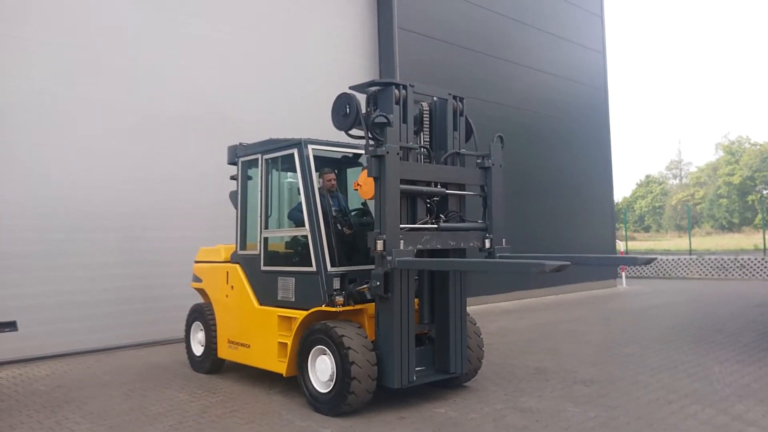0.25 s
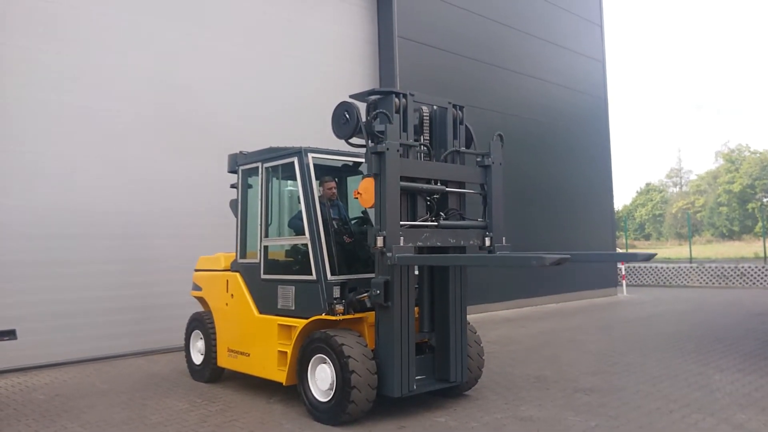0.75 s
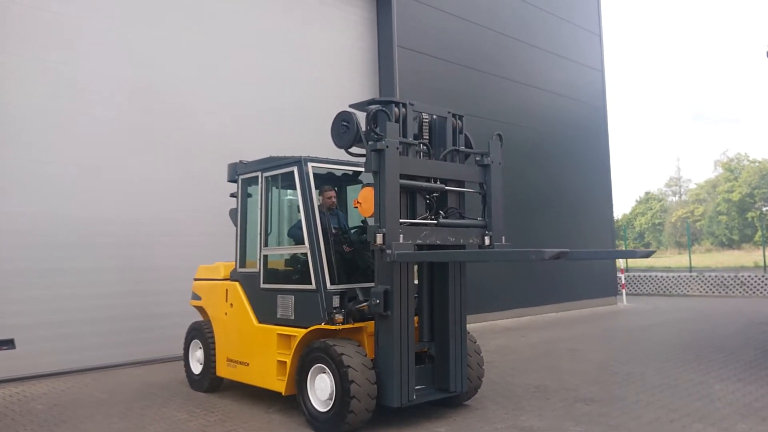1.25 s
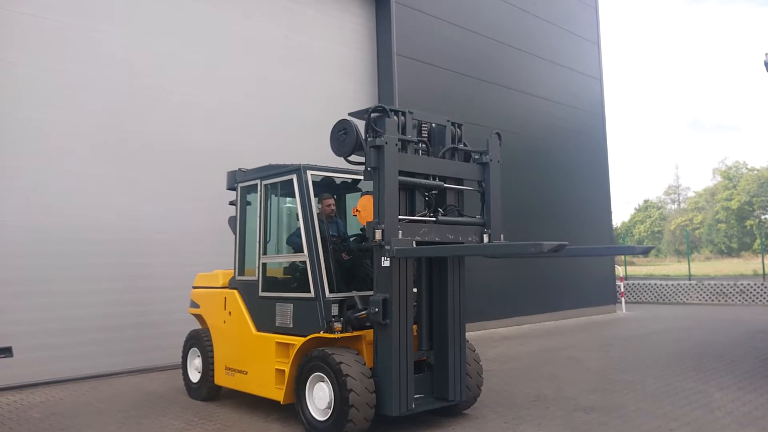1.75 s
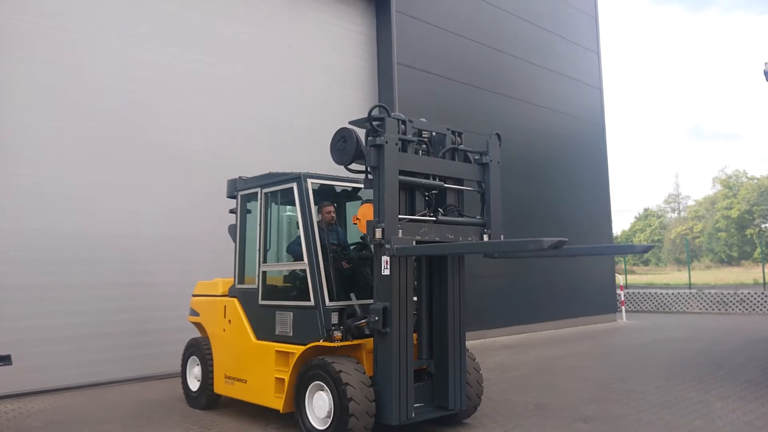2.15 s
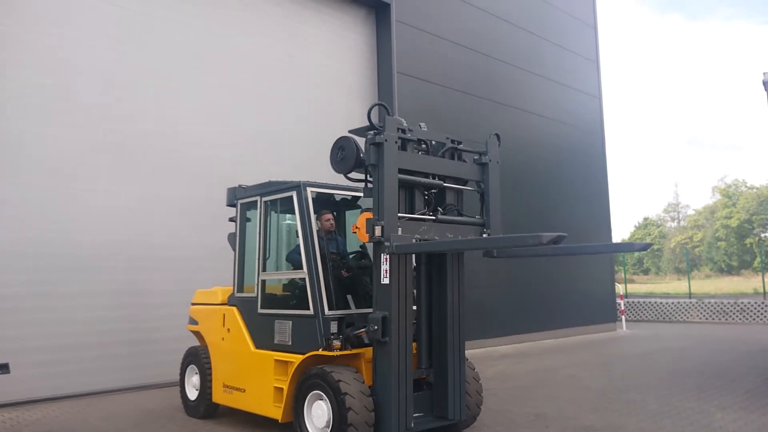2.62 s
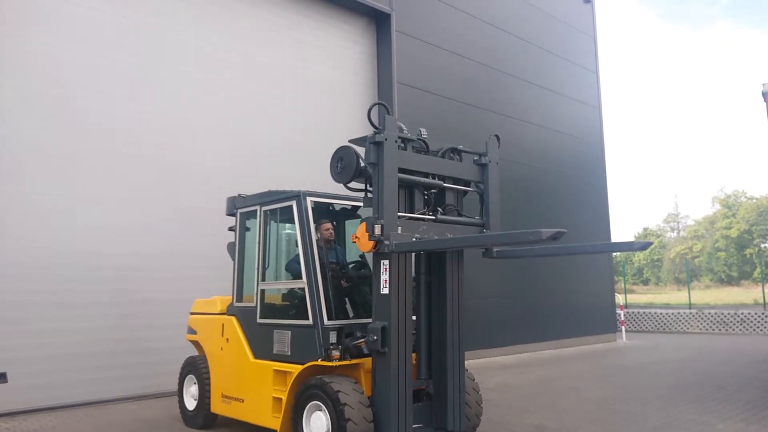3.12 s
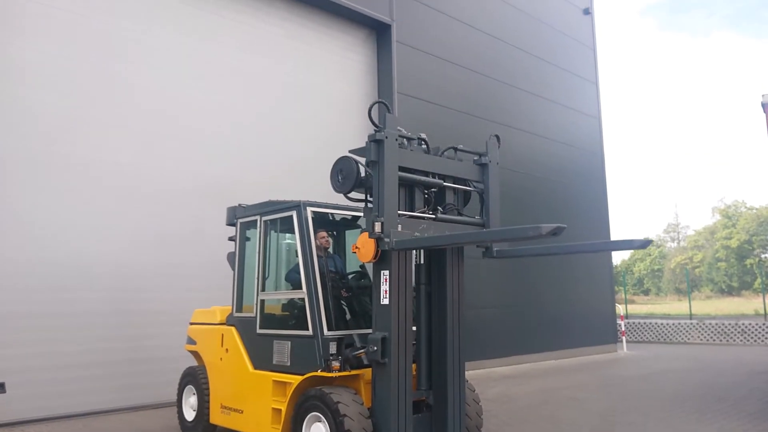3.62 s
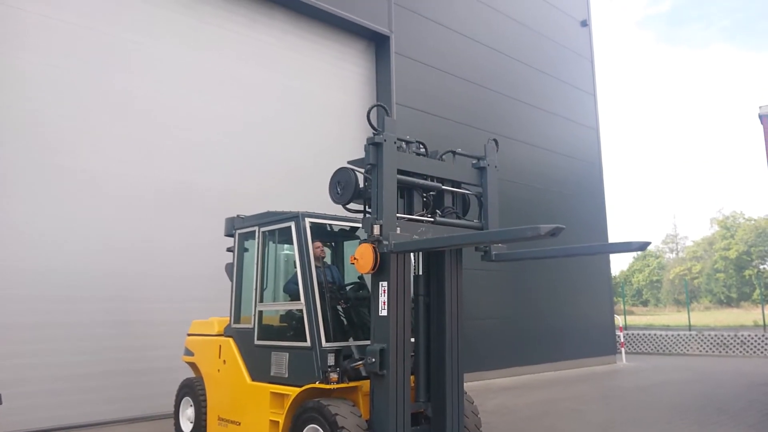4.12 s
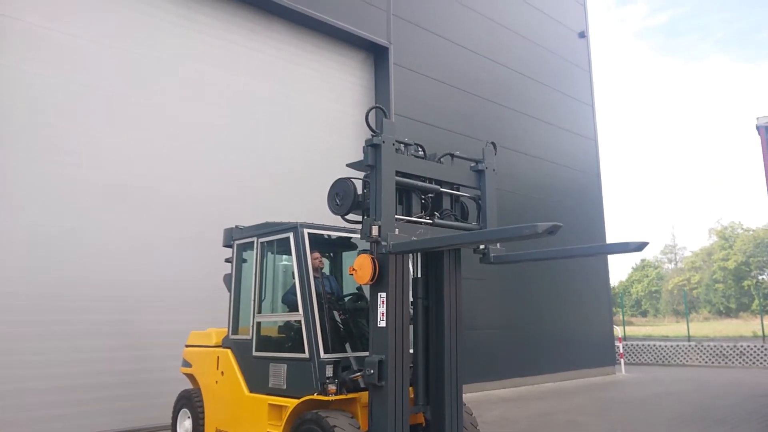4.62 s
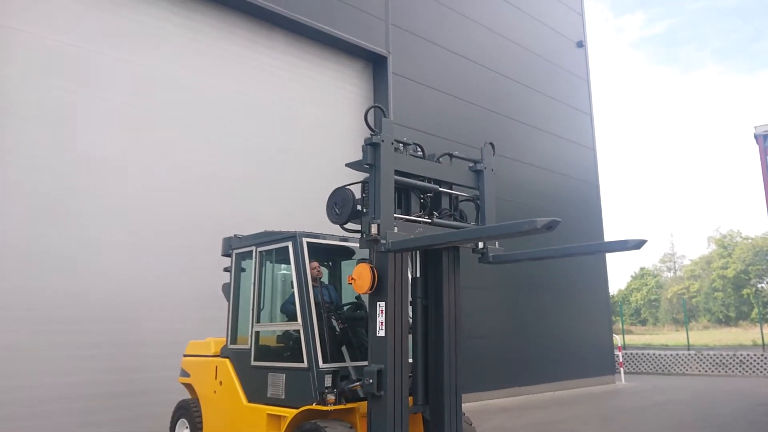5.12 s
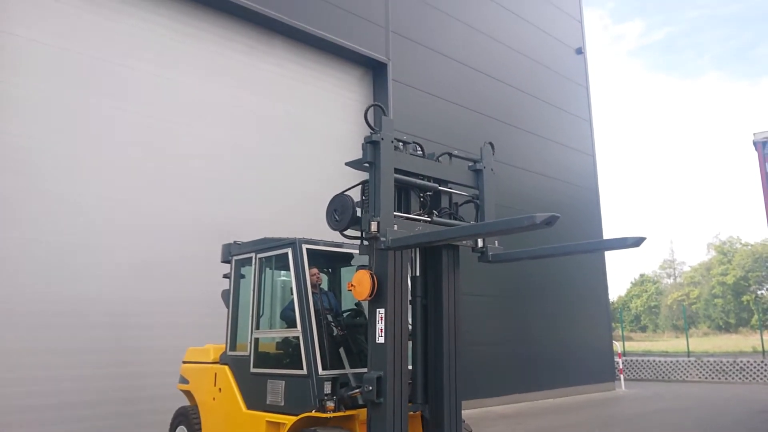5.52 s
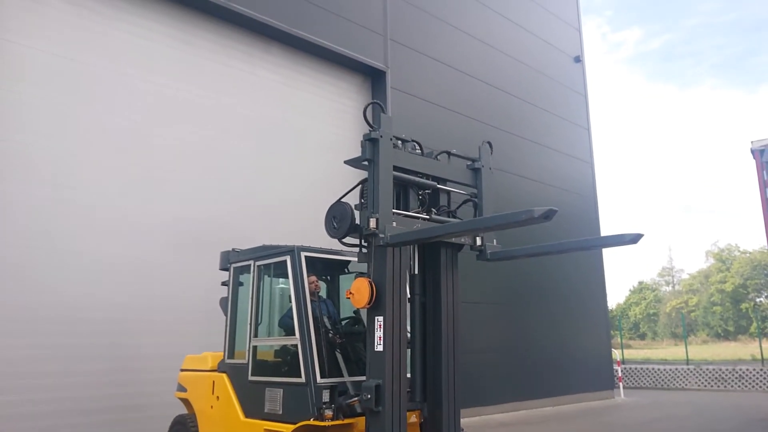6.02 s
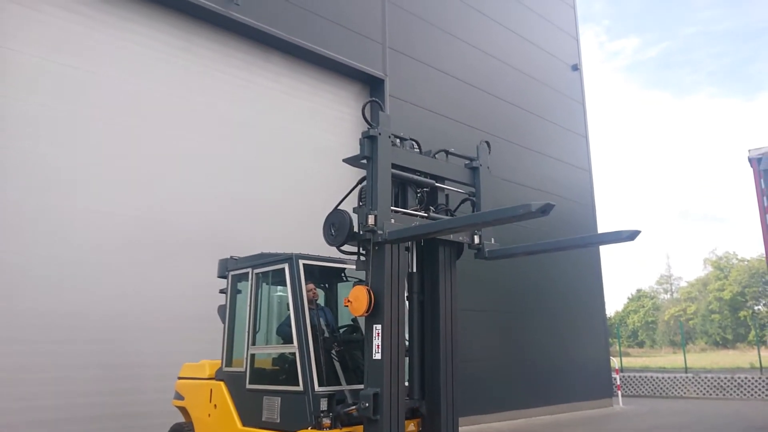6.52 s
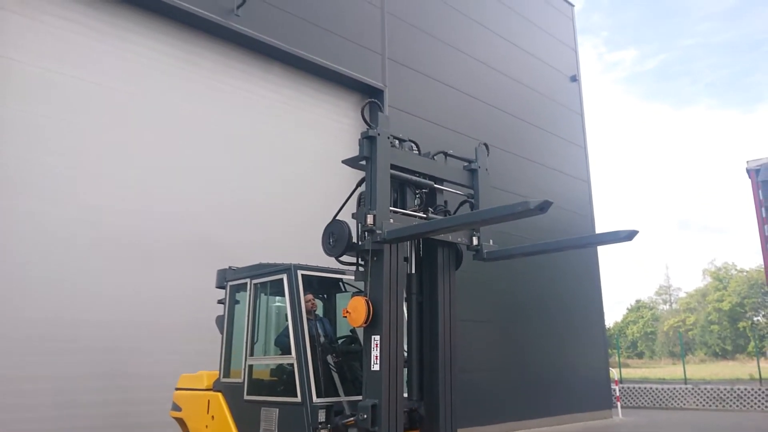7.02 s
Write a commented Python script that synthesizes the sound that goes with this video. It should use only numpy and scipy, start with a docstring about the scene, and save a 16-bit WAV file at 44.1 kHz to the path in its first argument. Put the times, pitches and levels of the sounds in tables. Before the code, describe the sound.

Steady six-cylinder diesel throb and tappet ticking fill the foreground, with booming panels, rattling guards and a tonal pump whine as forks lift. Around the middle the pitch suddenly dips and recovers, with a short oil hiss and a quick cluster of steel knocks. The engine then labours a little lower, and two dull bumps follow. Outdoors by a large wall, fairly close stereo pickup.

```python
"""A forklift's six-cylinder diesel idles at about 785 rpm beside a warehouse wall, raising the forks.
Firings drone in the exhaust and clatter in the block, the fan hisses and the hydraulic pump whines.
Near 4 s the mast picks up its next stage: the pump strains, the engine sags, oil spurts and steel clunks.
The load then stays higher and the engine slower, with two dull thuds near 5.4 s.
Sines make the drone, tones, whine, clunks and thuds; shaped noise makes the clatter, booms and hisses."""
import sys
import numpy as np
from scipy import signal
from scipy.fft import rfft, irfft
from scipy.io import wavfile
from scipy.ndimage import uniform_filter1d

SR = 44100
rng = np.random.default_rng(int(sys.argv[2]) if len(sys.argv) > 2 else 0)


def dump(signal):
    """Clip the signal to [-1, 1] and save it as 16-bit WAV at the path in sys.argv[1]."""
    limited = np.clip(np.atleast_2d(signal).T, -1, 1)
    pcm = np.round(limited * 32767).astype(np.int16)
    wavfile.write(sys.argv[1], SR, pcm)


N = 320166
TIME = np.arange(N) / SR  # s
GRID_HZ = np.fft.rfftfreq(N, 1 / SR)

# crankshaft speed: it sags as the mast takes up its next stage, recovers, then settles lower
# (time [s], speed [rpm])
CRANK_SPEED = [(0.0, 790), (0.72, 785), (0.97, 788.7), (1.58, 790.2), (2.6, 785.7), (2.88, 785.4),
               (3.25, 780.7), (3.44, 778.7), (3.57, 785.0), (3.75, 788.5), (3.86, 737.6), (3.96, 738.6),
               (4.02, 752.8), (4.07, 788.4), (4.12, 791.4), (4.28, 783), (4.42, 770), (4.5, 749.6),
               (4.72, 770.0), (4.85, 771), (5.0, 764), (5.15, 758.7), (5.37, 769.8), (5.5, 758),
               (5.59, 752.6), (5.7, 761.5), (5.95, 760.7), (6.12, 764.5), (6.6, 764.5), (7.26, 763.2)]
# strength of the six exhaust pulses in one crank turn, two for each firing
# (light load [dB], full load [dB])
EXHAUST_PULSES = [(1.5, 2), (2, 1.5), (-2.5, 3.5), (0, -6), (-1.5, -1), (0, 2)]
# engine tones (multiple of the four-stroke cycle rate, rounded in use [-], light load [dB],
# full load [dB], left minus right [dB], left lead [rad])
ENGINE_TONES = [(6, -38.5, -40.0, -8, 0.39), (9, -61, -51.0, -9, 0.4), (13, -55, -59, -1, 0.4),
                (15, -48, -47, 1, 0.4), (16, -46, -44, -4, 0.4), (18, -52.5, -43.5, -1, 0.49),
                (19, -59, -63, -2, 0.3), (21, -59, -48, -1, 0.2), (22, -50.5, -44, -5, 0.2),
                (24, -43.5, -44, -4, 0.3), (25, -50, -61, -2, 0.48), (26, -48, -50, 3, 0.47),
                (28, -46, -41.5, -1, 0.29), (29, -53, -53.5, -1, 0.45), (30, -48.5, -52.5, -1, 0.3),
                (32, -58.5, -53.0, -3, 0.3), (34, -55.5, -51, -2, 0.3), (36, -49.5, -49.0, -3, 0.2),
                (38, -65, -54.5, -3, 0.22), (42, -56, -48, -2, 0.3), (46, -57, -60, -4, 0.4),
                (48, -42.5, -39.5, -4, 0.52), (53, -54.5, -59.0, -12, 0.34), (54, -71, -53.5, -4, 0.4),
                (56, -55, -53, -5, 0.3), (60, -54, -52.5, 0, 0.72), (66.3, -58, -47.5, -9, 0.8),
                (67.3, -55, -59, -11, 1.0), (68.36, -49, -52, -7, 1.2), (71.7, -57.0, -57, -4, 1.3),
                (75.96, -59, -51.5, -8, 3.3), (105, -66, -55, 14, 0.46), (108, -61, -57.0, 2, 0.1),
                (114, -54.0, -50.5, -1, 0.11), (119.5, -46.5, -65, -2, 0.36), (141, -69, -52.5, -19, 1.9),
                (147, -64.0, -47.5, -8, 1.3), (150.3, -47, -72.0, -14.5, 1.5), (154, -69, -50.5, -8, 0.91),
                (228.7, -48.5, -58.5, 3.5, 2.95)]
# boom of the bonnet and panels, before the strength of what drives it
# (frequency [Hz], light load [dB per Hz], full load [dB per Hz], left minus right [dB])
PANEL_BOOM = [(25, -88, -85, -3), (45, -68, -63, -5), (63.7, -61, -53.5, -1), (105, -65.5, -64, -1),
              (127.96, -70.5, -67, -2), (190, -66.5, -59, -0.5), (240, -66, -66.5, -2),
              (357, -67.5, -65, -0.5), (471, -66.5, -61, -12.5), (535, -74.5, -75, 0)]
# ring of the engine block, before the strength of what drives it
# (frequency [Hz], level [dB per Hz], left minus right [dB])
BLOCK_RING = [(533, -72.5, -2), (610, -65.5, 10), (676, -65.5, 2), (850, -65, -2), (1020, -66, -6),
              (1340, -73.5, 0.5), (1410, -67.5, -2.5), (1700, -71, 6), (1910, -68.5, -11), (2345, -69, 2),
              (2550, -75, -2), (3420, -74.5, -6.5), (4300, -78, 1), (5320, -79, 3), (7200, -84, -2)]
# sharper resonances of covers and fuel lines
# (frequency [Hz], width [Hz], light load [dB over the block], full load [dB over the block])
COVER_RESONANCES = [(2364, 305, 5, 3.4), (2853, 78, 7, 4.5), (3140, 110, -2, 2.1), (3680, 90, 5, 5.5),
                    (4184, 92, 7, 4)]
# loose guards that chatter with the engine
# (frequency [Hz], half width [Hz], light load [dB per Hz], full load [dB per Hz])
LOOSE_GUARDS = [(3427, 134, -72.5, -78), (4860, 150, -75.5, -78.5), (5470, 280, -80, -83)]
# the pump's harmonics slide through resonances of the oil lines as the speed changes
# (speed [rpm], first harmonic [dB], second [dB], third [dB])
OIL_LINE_RESPONSE = [(742.5, -30.5, -34, -57), (752, -43, -36.5, -58), (759, -41, -38, -58),
                     (764.5, -39, -38, -56), (769, -35.5, -43, -54), (776, -38, -47, -48),
                     (782, -36.5, -50, -46.5), (794, -36, -48, -47.5)]
# wall echoes shift each pump harmonic between the ears as its pitch sags; one row a harmonic
# (left minus right at light load [dB], at full load [dB], left lead at light load [rad], at full load [rad])
PUMP_STEREO = [(-0.5, -14.5, 2.59, 1.53), (-3, -9.5, 1.7, 1.55), (8.5, 9, 2.58, 2)]
# the whine's harmonics fade and swell
# (time [s], half length [s], first harmonic [dB], second [dB], third [dB])
WHINE_SWELLS = [(.6, 1.2, -.5, 0, -5), (1.6, .6, 2, 1, -1), (3.845, .025, 0, 3, 0), (3.91, .05, 1.5, 0, 0),
                (4.51, .05, 0, 2, 0), (4.62, .05, -2, -5, 0), (5.36, .04, 0, -3, 0), (6.04, 0.1, 0, -2, 0),
                (6.85, .1, 0, 2, 0)]
# blows in the mast (time [s], level [dB], brightness [dB per octave])
MAST_BLOWS = [(4.114, -20, -3.5), (4.1227, -26, 0), (4.1342, -31, -4), (4.166, -30, -10), (4.171, -33, 7),
              (4.176, -26, 2.5), (4.180, -32, 5), (4.2, -26.5, -5)]
# modes of the mast, each slightly detuned at every blow
# (frequency [Hz], level added to the blow [dB], time to decay 60 dB [s])
MAST_MODES = [(120, -15, 0.12), (236, -9.5, 0.071), (296, -4.5, 0.076), (345, -3.5, 0.11), (424, -7.5, 0.1),
              (577, -11, 0.037), (680, -5.5, .04), (770, -1.5, 0.063), (967, -4.5, 0.033), (1250, -14, .05),
              (1444, -14, 0.05), (1960, -19, .04), (2260, -9, 0.042), (2390, -10.5, .04), (2880, -22, .04),
              (3220, -22, .04), (4000, -24, .03)]
# spurt of oil through the valve at the pressure peak (frequency [Hz], level [dB per Hz])
OIL_SPURT = [(3000, -68), (4500, -86), (6500, -75.5), (8200, -93), (10000, -87), (15000, -92)]
# dull low thuds (time [s], level [dB], frequency [Hz])
LOW_THUDS = [(5.392, -21, 66), (5.428, -19.5, 55)]
# hiss of fan and oil (frequency [Hz], level [dB per Hz], left minus right [dB])
FAN_OIL_HISS = [(6700, -81.5, 6), (7500, -92, 3), (7900, -115, -0.6), (8220, -91.5, 0),
                (10000, -91.5, -7.5), (11800, -92, -0.5), (13700, -88, 1), (15500, -90.8, 4.6)]
# likeness of the two ears' sound, direct and reflected together (frequency [Hz], correlation [-])
EAR_LIKENESS = [(150, 1), (340, 0.99), (520, -0.023), (740, 1), (1000, 0.33), (1300, -0.55), (1950, 0.092),
                (2150, 0.45), (2400, 0.99), (2650, 0.095), (5000, -0.062), (15000, -0.015)]

CYLINDERS = 6
BEATS_PER_CYCLE = 12  # each cylinder beats twice a cycle: it fires, and its valves close
TICKS_PER_CYCLE = 30
PUMP_TEETH_PER_TURN = 37
# the governor lets the speed droop with load: speed with the forks alone, and its loss with the mast stage too
LIGHT_RPM, DROOP_RPM = 780, 16
# load never leaves this range (0 = forks alone, 1 = forks and mast stage)
LEAST_LOAD, MOST_LOAD = 0.029, 0.93
DRONE_LOAD_DB = -1.5  # added to the drone at full load, on top of the pulse strengths
# the exhaust surges a moment after the governor feeds fuel to regain speed
SURGE_DB_PER_RPM_PER_S, SURGE_LAG_S = 0.0105, 0.075
SPURT_S, SPURT_ATTACK_S, SPURT_RELEASE_S = 4.015, .03, .05
TOP_HZ = 15700


def undb(db):
    """Decibels to gain."""
    return 10 ** (np.asarray(db) / 20)


def blend(light, full, load):
    """Slide from the light-load value to the full-load value."""
    return light + load * (full - light)


def decay(age, t60):
    """Fading that falls 60 dB in t60 seconds."""
    return np.exp(-np.log(1000) * age / t60)


def curves(table):
    """Each column of a table in time, one value a sample."""
    s, *columns = np.transpose(table)
    return [np.interp(TIME, s, c) for c in columns]


def spectra(table):
    """Each column of a table on the FFT grid, straight on a log-frequency axis."""
    hz, *columns = np.transpose(table)
    grid = np.log(np.maximum(GRID_HZ, 1))
    return [np.interp(grid, np.log(hz), c) for c in columns]


def walk(rate):
    """Smooth random wander with a standard deviation of 1, taking `rate` steps a second."""
    k = int(SR / rate)
    steps = np.repeat(rng.standard_normal(N // k + 1), k)
    smooth = uniform_filter1d(uniform_filter1d(steps, k), k)[:N]
    return smooth / smooth.std()


def pan(db):
    """Left and right gains, db apart, that keep the total power the same."""
    gains = undb(np.array([[.5], [-.5]]) * db)
    return gains / np.sqrt(np.mean(gains ** 2, axis=0))


def radiate(pair, db, pan_db, low_hz, high_hz):
    """Give two unrelated white signals a spectrum between two edges and spread them over the ears."""
    hz = np.maximum(GRID_HZ, 1)
    edges = ((1 + (low_hz / hz) ** 20) * (1 + (hz / high_hz) ** 20)) ** -.5
    alike = np.clip(spectra(EAR_LIKENESS)[0], -.99, .99)
    mid, side = rfft(pair) * np.sqrt([(1 + alike) / 2, (1 - alike) / 2])
    ears = np.array([mid + side, mid - side])
    return irfft(ears * pan(pan_db) * edges * undb(db), N) * np.sqrt(SR / 2)


def governor(rpm):
    """Load on the engine, told by how far its speed has drooped."""
    return np.clip((LIGHT_RPM - rpm) / DROOP_RPM, LEAST_LOAD, MOST_LOAD)


def surge(rpm, smooth_s=0.11):
    """Extra exhaust level in dB while the engine pulls its speed back up."""
    gaining = np.maximum(np.gradient(rpm, TIME), 0)
    gaining = uniform_filter1d(gaining, max(int(smooth_s * SR), 1))
    return SURGE_DB_PER_RPM_PER_S * np.interp(TIME - SURGE_LAG_S, TIME, gaining)


def exhaust(cycle, rpm, load, drone_db=-30.2, pan_db=-2.5, lead=0.41, swing=0.13, lag_turns=0.081,
            wander=.03, waver_db=0.04):
    """The drone at twice the firing rate throbs once a turn: unequal pulses swing the crank after each push."""
    light_db, full_db = np.transpose(EXHAUST_PULSES)
    places = np.arange(len(light_db)) / len(light_db)
    turns = 2 * cycle

    def stroke_db(position):
        """Pulse strength at a place in the turn, smoothed over 10 ms."""
        light, full = (np.interp(position, places, db, period=1) for db in (light_db, full_db))
        return uniform_filter1d(blend(light, full, load), SR // 100)

    phase = 2 * np.pi * BEATS_PER_CYCLE * cycle
    phase = phase + swing * stroke_db(turns - lag_turns) + wander * walk(9.9)
    db = drone_db + stroke_db(turns) + DRONE_LOAD_DB * load + surge(rpm) + waver_db * walk(6.6)
    return np.sqrt(2) * undb(db) * pan(pan_db) * np.sin(phase + np.array([[lead], [0]]))


def overtones(cycle, load, waver_db=0.85, phase_waver=0.11, waver_per_multiple=.013):
    """Out-of-step engine tones blend into a hum; high ones waver more, multiples of the firing rate less."""
    out = 0
    for multiple, light_db, full_db, pan_db, lead in ENGINE_TONES:
        multiple = round(multiple)
        unsteady = (.4 if multiple % CYLINDERS == 0 else 1) + waver_per_multiple * multiple
        phase = 2 * np.pi * (multiple * cycle + rng.random()) + unsteady * phase_waver * walk(12)
        db = blend(light_db, full_db, load) + unsteady * waver_db * walk(7)
        out = out + np.sqrt(2) * undb(db) * pan(pan_db) * np.sin(phase + np.array([[lead], [0]]))
    return out


def knocks(cycle, t60, scatter_db, jitter_s):
    """Each firing and valve closing strikes its own dense ring through bay and yard, repeated each cycle."""
    beat = np.arange(int(cycle[-1] * BEATS_PER_CYCLE))
    chance = rng.standard_normal((1000, 2))[beat]  # each beat's own lateness and loudness
    when = np.interp(beat / BEATS_PER_CYCLE, cycle, TIME) + jitter_s * chance[:, 0]
    at = np.clip(np.round(when * SR).astype(int), 0, N - 1)
    age = TIME[:SR // 4]
    rings = rng.standard_normal((BEATS_PER_CYCLE, 2, len(age))) * decay(age, t60)
    out = np.zeros((2, N + len(age)))
    for k, start, size in zip(beat, at, undb(scatter_db * chance[:, 1])):
        out[:, start:start + len(age)] += size * rings[k % BEATS_PER_CYCLE]
    return out[:, :N] / out[:, :N].std()


def ticks(cycle, t60=0.02, uneven_db=2.0, scatter_db=1.2, jitter_s=6e-5):
    """Tappets and injectors tick sharply, each at its own uneven place in the cycle and with its own strength."""
    age = TIME[:SR // 25]
    out = np.zeros((2, N + len(age)))
    for k in range(TICKS_PER_CYCLE):
        places = np.arange((k + rng.random()) / TICKS_PER_CYCLE, cycle[-1])
        strength = undb(uneven_db * (2 * rng.random() - 1))
        ring = strength * rng.standard_normal((2, len(age))) * decay(age, t60)
        chance = rng.standard_normal((100, 2))
        for s, (late, loud) in zip(np.interp(places, cycle, TIME), chance):
            start = int(np.clip((s + jitter_s * late) * SR, 0, N - 1))
            out[:, start:start + len(age)] += undb(scatter_db * loud) * ring
    return out[:, :N] / out[:, :N].std()


def rush(cycle, beat_db, lope_db, flicker_db):
    """Turbulence that swells with each beat and once more with each firing."""
    beat = 2 * np.pi * BEATS_PER_CYCLE * cycle
    swell_db = beat_db * np.cos(beat) + lope_db * np.cos(beat / 2) + flicker_db * walk(25)
    noise = rng.standard_normal((2, N)) * undb(swell_db)
    return noise / noise.std()


def clatter(cycle, load, knock_db=-5, rush_db=-7, tick_db=-8.5, load_db=1.5):
    """Diesel knock and valve gear ring the block and its covers."""
    drive = undb(knock_db) * knocks(cycle, t60=0.2, scatter_db=1.5, jitter_s=5e-5)
    drive = drive + undb(rush_db) * rush(cycle, beat_db=-0.9, lope_db=-0.8, flicker_db=0.7)
    drive = drive + undb(tick_db) * ticks(cycle)
    block_db, pan_db = spectra(BLOCK_RING)
    hz, width, light_db, full_db = np.transpose(COVER_RESONANCES)
    bells = 1 / (1 + (2 * (GRID_HZ[:, None] - hz) / width) ** 2)
    light, full = (radiate(drive, block_db + bells @ db, pan_db, low_hz=540, high_hz=6500)
                   for db in (light_db, full_db))
    return blend(light, undb(load_db) * full, load)


def panels(cycle, load, knock_db=-7.0, rush_db=-0.5):
    """Bonnet and panels boom with the firings, more deeply under load."""
    drive = undb(knock_db) * knocks(cycle, t60=0.071, scatter_db=-1.5, jitter_s=1e-4)
    drive = drive + undb(rush_db) * rush(cycle, beat_db=-0.5, lope_db=2, flicker_db=0.3)
    light_db, full_db, pan_db = spectra(PANEL_BOOM)
    light, full = (radiate(drive, db, pan_db, low_hz=24, high_hz=543) for db in (light_db, full_db))
    return blend(light, full, load)


def rattle(cycle, load, scatter_db=2, waver_db=1.4):
    """Loose guards chatter unevenly at each beat, each coming and going on its own; load presses them tight."""
    drive = knocks(cycle, t60=0.2, scatter_db=scatter_db, jitter_s=4e-5)
    out = 0
    for hz, width, light_db, full_db in LOOSE_GUARDS:
        bell_db = -20 * np.log10(1 + ((GRID_HZ - hz) / width) ** 2)
        ring = radiate(drive, bell_db, 0, low_hz=2500, high_hz=7000)
        out = out + ring * undb(blend(light_db, full_db, load) + waver_db * walk(4.95))
    return out


def pump(cycle, rpm, load, twist=0.13, wander=0.04, flutter_db=.5, drift_db=.5, shudder_db=0.35):
    """Pump teeth whine through oil-line resonances and shudder under load; uneven turning adds sidebands."""
    crank = 2 * np.pi * 2 * cycle
    tooth = PUMP_TEETH_PER_TURN * crank + twist * np.sin(crank) + wander * walk(22)
    speeds, *responses = np.transpose(OIL_LINE_RESPONSE)
    out = 0
    for k, (response_db, arrival) in enumerate(zip(responses, PUMP_STEREO), 1):
        light_pan, full_pan, light_lead, full_lead = arrival
        pan_db = blend(light_pan, full_pan, load)
        lead = blend(light_lead, full_lead, load)
        db = np.interp(rpm, speeds, response_db)
        # higher harmonics are less steady
        db = db + flutter_db * np.sqrt(k) * walk(30) + drift_db * (k - 1) ** 2 * walk(6.2)
        db = db + shudder_db * load * walk(16)
        for s, length, *dbs in WHINE_SWELLS:
            db = db + dbs[k - 1] * np.exp(-((TIME - s) / length) ** 2)
        wave = np.sin(k * tooth + np.array([[.5], [-.5]]) * lead)
        out = out + np.sqrt(2) * undb(db) * pan(pan_db) * wave
    return out


def mast(spread=0.63, detune=0.0087, contact_s=0.0012, echo_db=-7, echo_t60=0.33, grind=0.46, grind_hz=500):
    """Steel stages knock and ring the mast's modes, grinding as they touch; wall and yard roughen the decay."""
    out = np.zeros((2, N))
    hz, db, t60 = np.transpose(MAST_MODES)[:, :, None]
    age = TIME[:SR // 2]
    for s, blow_db, tilt_db in MAST_BLOWS:
        chance = rng.standard_normal((3, len(hz), 1))  # left phase, right phase, tuning
        size = undb(blow_db + db + tilt_db * np.log2(hz / 500)) * decay(age, t60)
        phase = 2 * np.pi * hz * (1 + detune * chance[2]) * age
        phase = phase + spread * chance[:2] * np.minimum(hz / 1000, 1)
        rough = uniform_filter1d(rng.standard_normal(size.shape), int(SR / grind_hz), axis=1)
        size = size * (1 + grind * rough / rough.std())
        onset = 1 - np.exp(-age / contact_s)
        start = int(s * SR)
        out[:, start:start + len(age)] += np.sum(size * np.sin(phase), axis=1) * onset
    yard = rng.standard_normal((2, len(age))) * decay(age, echo_t60)
    yard = yard / np.sqrt(np.sum(yard ** 2, axis=1, keepdims=True))
    echo = signal.oaconvolve(out, yard, axes=1)[:, :N]
    return (out + undb(echo_db) * echo) * pan(-1.8)


def spurt():
    """Oil rushes through the valve for a moment before the stage moves."""
    age = TIME - SPURT_S
    swell = np.exp(np.minimum(age / SPURT_ATTACK_S, -age / SPURT_RELEASE_S))
    noise = rng.standard_normal((2, N))
    return swell * radiate(noise, spectra(OIL_SPURT)[0], 0, low_hz=2808, high_hz=16000)


def thuds(swell_s=0.01):
    """Soft low bumps that swell and die within a few cycles."""
    out = 0
    for s, db, hz in LOW_THUDS:
        age = np.maximum(TIME - s, 0)
        swell = age / swell_s * np.exp(1 - age / swell_s)
        out = out + undb(db) * swell * np.sin(2 * np.pi * hz * age)
    return out * pan(-2.5)


def hiss(cycle, load, load_db=0.1, split_hz=11500):
    """Fan air hisses, and above it oil sizzles with a flicker of its own."""
    air = rush(cycle, beat_db=.5, lope_db=.5, flicker_db=1.06)
    air = radiate(air, *spectra(FAN_OIL_HISS), low_hz=6600, high_hz=split_hz)
    oil = rush(cycle, beat_db=0.8, lope_db=0.5, flicker_db=1.0)
    oil = radiate(oil, *spectra(FAN_OIL_HISS), low_hz=split_hz, high_hz=19000)
    return (air + oil) * undb(load_db * load)


def scene():
    """Engine and pump turn with the crank, two turns to a four-stroke cycle; the mast's sounds are timed."""
    rpm, = curves(CRANK_SPEED)
    cycle = np.cumsum(rpm) / (2 * 60 * SR)  # four-stroke cycles since the start
    load = governor(rpm)
    engine = exhaust(cycle, rpm, load) + overtones(cycle, load)
    engine = engine + clatter(cycle, load) + panels(cycle, load) + rattle(cycle, load)
    lift = pump(cycle, rpm, load) + mast() + spurt() + thuds()
    return engine + lift + hiss(cycle, load)


def record(dry, low_hz=30):
    """The microphone drops the deepest rumble and its top is cut steeply."""
    dry = signal.sosfilt(signal.butter(6, low_hz, "high", fs=SR, output="sos"), dry)
    return signal.sosfilt(signal.ellip(12, .1, 80, TOP_HZ, fs=SR, output="sos"), dry)


dry = scene()
out = record(dry)
dump(out)
```